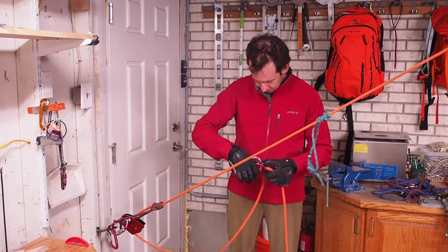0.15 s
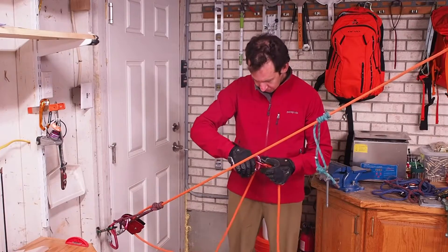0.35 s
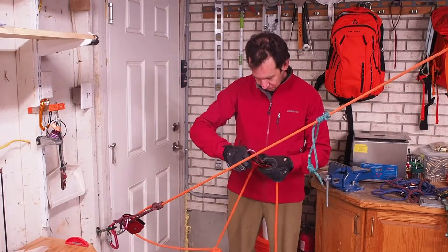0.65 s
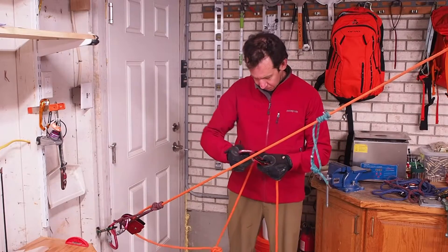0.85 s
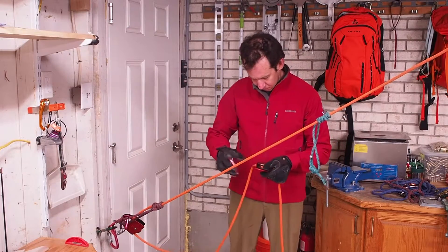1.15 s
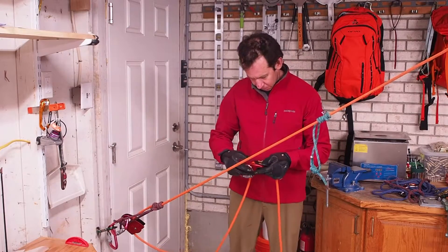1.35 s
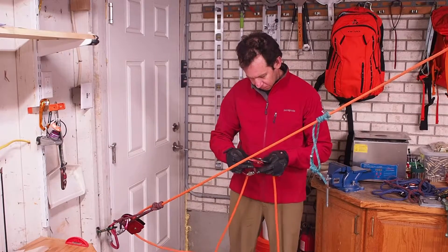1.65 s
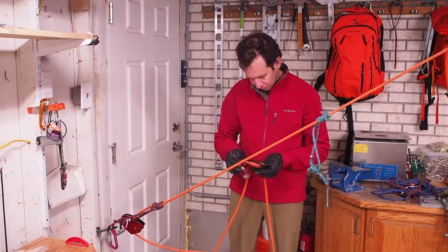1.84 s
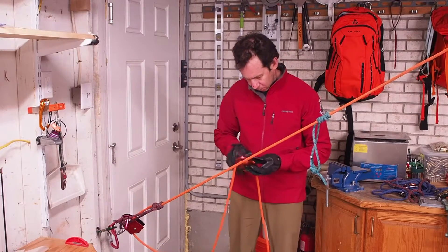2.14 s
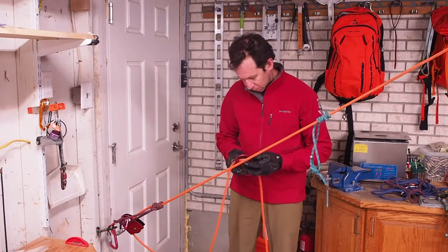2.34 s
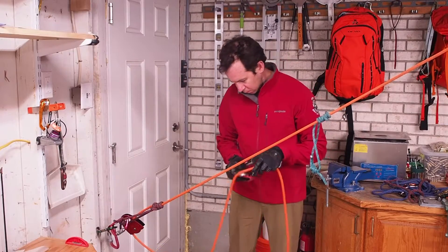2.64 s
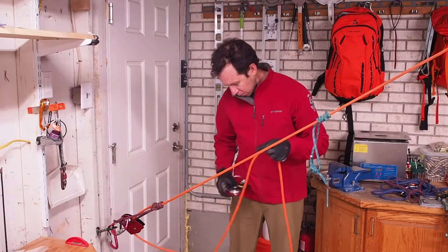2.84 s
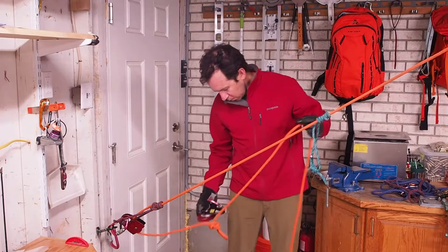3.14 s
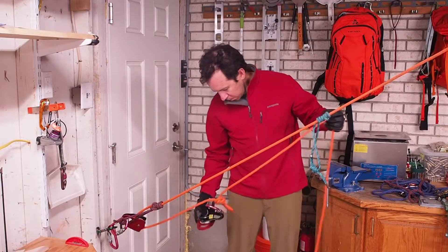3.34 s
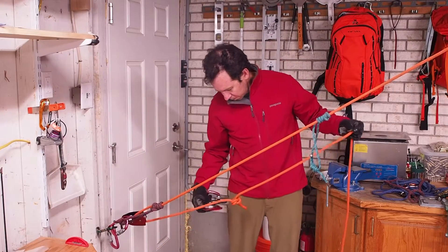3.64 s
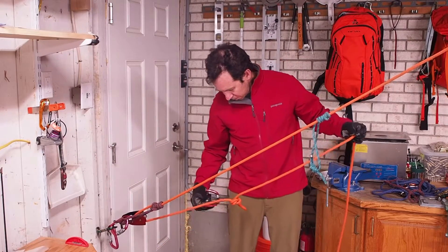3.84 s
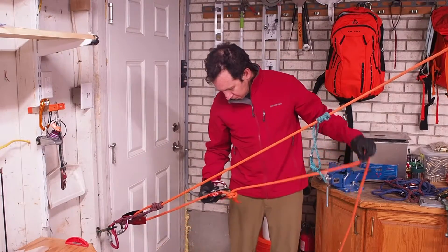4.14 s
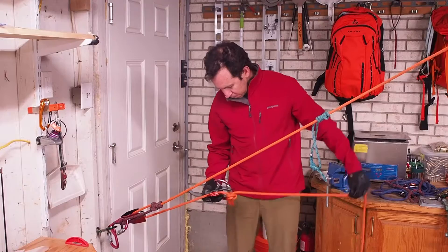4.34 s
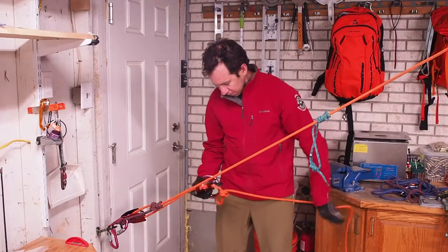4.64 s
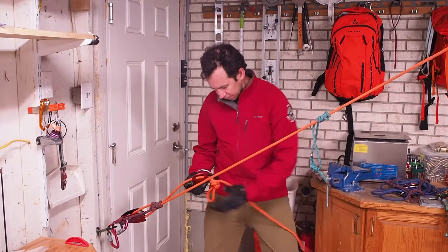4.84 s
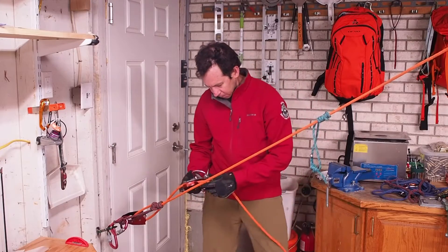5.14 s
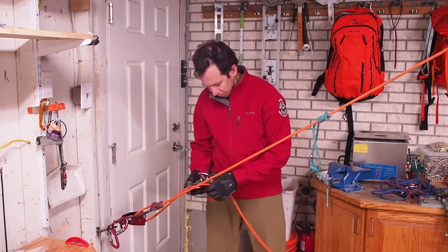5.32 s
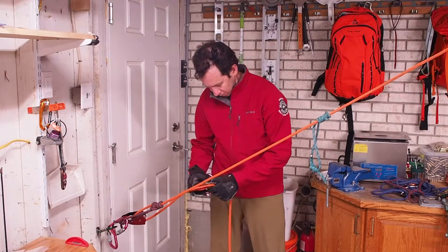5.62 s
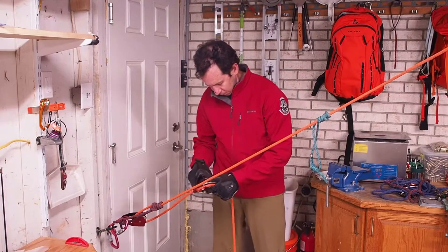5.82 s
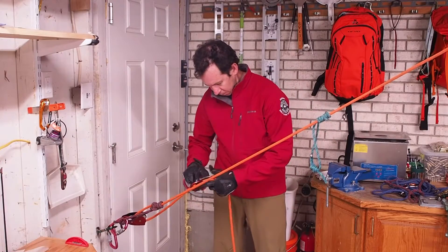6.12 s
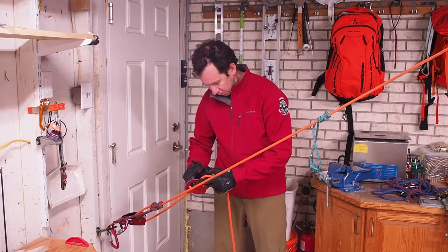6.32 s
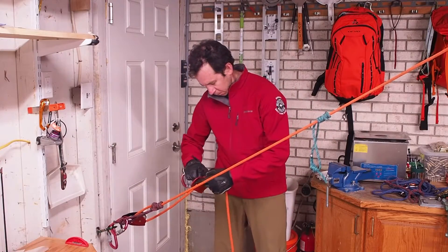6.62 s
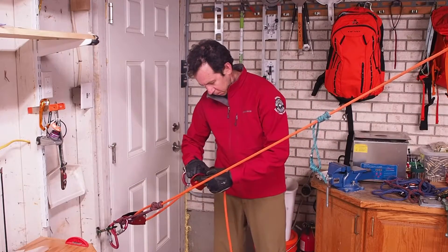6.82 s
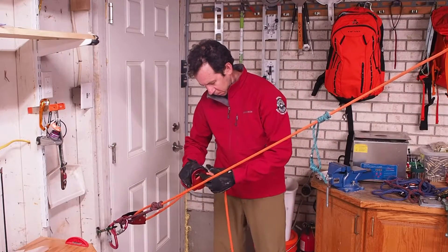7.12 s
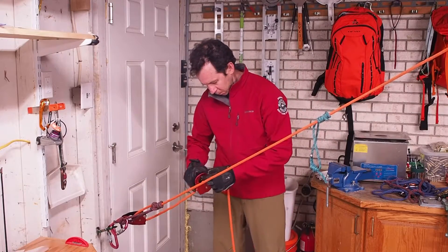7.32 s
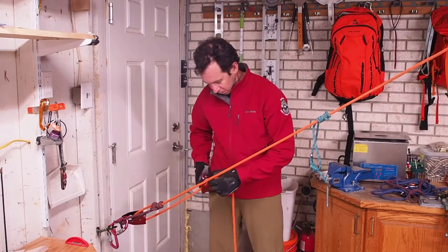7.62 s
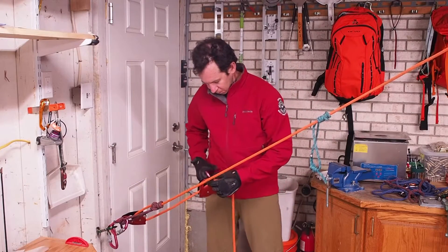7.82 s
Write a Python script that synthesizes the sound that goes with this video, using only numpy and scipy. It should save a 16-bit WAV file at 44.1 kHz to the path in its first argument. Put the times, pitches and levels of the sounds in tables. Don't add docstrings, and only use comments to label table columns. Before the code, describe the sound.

Metal pulley and carabiners rattle, snap hard and clink at close range, with gloves rubbing along rope in a small humming garage.

```python
import sys
import numpy as np
from scipy import signal
from scipy.io import wavfile
from scipy.ndimage import uniform_filter1d

SR = 44100
rng = np.random.default_rng(int(sys.argv[2]) if len(sys.argv) > 2 else 0)


def transcribe(signal):
    frames = np.atleast_2d(signal).T
    limited = np.clip(frames, -1, 1)
    pcm = np.round(limited * 32767).astype(np.int16)
    wavfile.write(sys.argv[1], SR, pcm)


def undo_db(level):
    steps = np.asarray(level, float) / 20
    return 10 ** steps


N = 351477

# (time [s], blow level [dB], dull part [dB], best rung pitch [Hz], ring level [dB])
PULLEY_KNOCKS = [
    (0.1126, -39.5, -7.5, 3650, -2),
    (0.2119, -24, -14, 3240, -19),
    (0.2346, -9, -19, 4900, -13),
    (0.393, -21.5, -18.5, 2140, -1.5),
    (0.4443, -12, -20.5, 3970, -9),
    (0.7045, -32, -17.5, 2640, -0.5),
    (0.7474, -11, -16, 5020, -7.5),
    (0.7997, -28.5, -11, 1690, -6.5),
]
PLATE_KNOCKS = [
    (0.8808, 4.5, -31, 3460, -14.5),
    (1.3518, -1.5, -23, 3660, -10.5),
    (1.5526, -11.5, -19.5, 3470, -7.5),
]
CLIP_KNOCKS = [(2.2524, -6.5, -25, 3270, -4), (2.3392, -7.5, -26, 3260, 2), (2.4277, -10, -29, 3260, -0.5),
               (2.4855, -19.5, -26, 4690, -4.5), (4.4087, -16, -18, 4670, -5),
               (3.8644, -40, -15, 1600, -12), (4.8671, -28, -12, 1750, -12), (5.0244, -32, -7.5, 1770, -14),
               (6.906, -44.5, -18, 3700, -11), (7.387, -48, -2, 2250, -8), (7.4907, -37.5, -7, 1960, -9)]
HOOK_KNOCKS = [
    (2.6550, -10, -32, 7600, -8),
    (2.6972, -14, -20.5, 5990, -7),
    (4.1990, -22, -19.5, 6100, -5),
    (4.2799, -31, -15, 3930, -11),
    (4.3597, -38, -12, 3800, -1),
    (5.2655, -14, -24, 3800, -4),
    (5.3700, -16, -15, 5530, -10),
]
GATE_KNOCKS = [
    (.9823, 9.5, -22.5, 14480, 0.79),
]
LOOSE_KNOCKS = [
    (.53, -47, 2, 1750, 0),
    (4.283, -52, 4, 1690, 0),
    (4.325, -55, 4, 1690, 0),
    (4.44, -54, 4, 1690, 0),
]
# (time [s], length [s], level [dB], dull part [dB], best rung pitch [Hz])
CHATTER = [(-.03, 0.042, -20.5, -32, 3740), (0.143, 0.028, -25.5, -8.5, 3700),
           (0.366, 0.021, -28, -24, 7900), (0.465, 0.086, -43, -2.5, 1690),
           (0.806, 0.051, -17.5, -14.5, 3550), (0.882, .02, -13.5, -10.5, 6300),
           (1.379, 0.046, -20, -16, 4130), (1.442, 0.055, -24, -15.5, 2050),
           (1.903, 0.077, -18, -20.5, 4350), (3.105, 0.096, -28, -12.5, 4400), (4.26, 0.19, -41, -10, 1690),
           (5.267, .02, -21.5, -18.5, 4600), (5.489, 0.047, -37.5, -10.5, 1600),
           (5.577, 0.027, -40, -14, 4000), (7.355, 0.055, -40, -5, 2140)]

# (pitch [Hz], level [dB], t60 [s])
PULLEY = [(894, -7, 0.0318), (1557, -3.5, 0.043), (1702, -1.5, 0.039), (2050, 11.5, 0.014),
          (2374, 2.5, 0.037), (3260, 9.5, 0.018), (3580, 5.5, 0.032), (3734, 9.5, 0.0275), (4130, 2, 0.08),
          (4350, 5, 0.06), (4655, 3, .05), (6300, 2.5, 0.049), (7660, 2.5, 0.095), (9000, -6, 0.039),
          (10430, -6.5, 0.051), (13700, -3, .04)]
PLATE = [(847, -15, 0.24), (1537, -7.5, 0.099), (1600, 4, 0.029), (2050, 9.5, 0.022), (2286, -0.5, .06),
         (3260, 2, 0.072), (3537, 8.5, 0.028), (4130, -17, 0.05), (4700, 2, 0.031), (6300, -8, 0.075),
         (7800, -12, .06), (9800, -7.5, .06), (11200, -5, 0.0497), (13600, -5, .05)]
HOOK = [(1810, -2.5, 0.043), (2450, -5, 0.064), (3270, -7, 0.16), (3810, -1, 0.067), (4706, 1, 0.1),
        (5100, -21, 0.059), (6100, -1.5, 0.049), (7510, 3, 0.091), (8200, -19, 0.071), (10040, 1, .08),
        (11600, -13, .08), (13450, 4, .06), (14860, -6, .04), (15500, -5, .04)]
GATE = [(12830, -6, .05), (13090, -4, .05), (13290, -3, .05), (13560, -5, .05), (13790, -3, .05),
        (13930, -4, .06), (14150, -3, .04), (14320, -4, .05), (14500, -2, .05), (14840, -2, .05),
        (15100, -1, .05), (15420, -3, .03)]
CLIP_HZ = [1685, 1785, 2250, 3257, 3750, 4300, 4675, 5030, 5290, 6195, 7510, 8660, 9900, 11100, 13550,
           15360]
# (level [dB], t60 [s])
CLIP_RING = [(-1, 0.025), (-9, 0.08), (-2.5, 0.031), (-10, 0.21), (-2, .06), (-10, 0.059), (1.5, 0.053),
             (-24, 0.035), (-24, 0.049), (2, 0.036), (3, 0.022), (-2.5, 0.073), (-7, 0.018), (-15, .06),
             (11, 0.073), (-8, .04)]

# (crack t60 [s], left-right difference [dB], bright part at a medium blow [dB],
# brightening [dB per dB harder], seating time [s])
PULLEY_CRACK = (.034, .3, -20, -0.28, .0009)
PLATE_CRACK = (0.0421, -3.3, -18, -.2, .0002)
CLIP_CRACK = (0.0364, 0.2, -30.5, 0.12, .0003)
HOOK_CRACK = (.045, 1, -23, 0.63, .0025)
GATE_CRACK = (0.0066, -8, -11, 0.0356, .0002)
CHATTER_CRACK = (0.0143, -0.3, -22, 0.96, .0004)

# (middle time [s], half length [s], pressure level [dB], cloth against rope [dB])
STROKES = [(.1, 0.34, -51.5, 1), (1.04, 0.44, -48.5, -5), (2.078, 0.16, -45, 0), (2.84, 0.4, -50, -2),
           (3.205, 0.15, -56, -3), (3.74, 0.4, -55, -11), (4.206, 0.086, -49, -7), (4.594, 0.18, -48.5, 0),
           (5.03, 0.24, -40, -0.5), (5.51, 0.19, -50, -5.5), (5.801, 0.096, -54, 7.5),
           (6.0, 0.091, -56.5, 4.5), (6.172, 0.086, -50.5, -8), (6.585, 0.12, -53.5, 2.5),
           (7.0, .1, -60, 6), (7.16, .07, -51, -4), (7.413, 0.087, -57, -13), (7.55, 0.091, -50.5, 1),
           (7.65, .035, -47.5, 2), (7.7, 0.13, -53.5, -1.5), (7.97, 0.17, -51.5, -7)]
# (level [dB], share of the cloth level [dB per dB])
RUB_LAYERS = [(-0.44, -0.31), (-3.5, 0.13), (-5, 0.98)]
# (low edge [Hz], high edge [Hz], left-right likeness [0-1])
RUB_BANDS = [(550, 1500, .8), (1800, 6500, .5), (7000, 15800, .2)]
# (time [s], puff level [dB], push level [dB], push pitch [Hz], length [s])
BUMPS = [
    (1.197, -44, -36, 107, 0.073),
    (3.5, -33.5, -37, 129.7, 0.077),
    (3.53, -37.5, -43, 300, 0.09),
    (3.975, -63, -43, 142.5, 0.083),
    (4.794, -31, -36.5, 327, 0.011),
    (4.823, -61, -38, 143, 0.069),
    (5.014, -40, -35, 290, 0.017),
    (5.032, -63, -40, 100, 0.05),
    (6.166, -42.5, -51, 149, 0.035),
    (7.357, -40.5, -38.5, 156, 0.048),
]

# (frequency [Hz], t60 [s])
WALLS = [(300, 0.31), (1500, 0.48), (4000, 0.36), (9000, 0.31), (15000, 0.26)]
# (frequency [Hz], left-right likeness [0-1])
WALLS_SAME = [(600, 0.85), (1500, 0.9), (3000, 0.089), (15000, 0.038)]
# (frequency [Hz], level [dB per Hz])
AIR = [(25, -14), (60, -4), (125, 1.5), (250, -10.5), (400, -7.5), (630, -13), (900, -8.5), (1400, -18),
       (2500, -20.5), (3700, -22), (6300, -30), (10000, -28.5), (13500, -28), (15700, -19.5)]
# (frequency [Hz], left-right likeness [0-1])
AIR_SAME = [(60, .5), (300, .5), (640, .6), (1400, .45), (3100, .15), (15000, .05)]
# (frequency [Hz], gain [dB])
MIC = [(500, 0), (6000, 4), (11600, 3), (12350, 2), (13100, 9), (13800, 6.5), (15500, -1)]

MEDIUM_DB = -20
AIR_DB = -50.5
OFFSET = -0.0045
EDGE_HZ = 15850


def evened(x):
    return x / np.sqrt(np.mean(x ** 2) + 1e-20)


def read(points, hz):
    f, value = np.transpose(points)
    return np.interp(np.log(hz + 1), np.log(f + 1), value)


def band(x, lo_hz, hi_hz, order=2):
    return signal.sosfilt(signal.butter(order, [lo_hz, hi_hz], "band", fs=SR, output="sos"), x)


def add(mix, s, sound):
    part = mix[..., round(s * SR):][..., :sound.shape[-1]]
    part += sound[..., :part.shape[-1]]


def pair(frames, bins, same):
    a, b, c, d = rng.standard_normal((frames, bins, 4)).T
    same = same[:, None]
    left = a + 1j * b
    right = same * left + np.sqrt(1 - same ** 2) * (c + 1j * d)
    return np.array([left, right])


def contact_crack(t, crack_t60, dull_db, bright_db, side):
    burst = rng.standard_normal((2, len(t))) * (undo_db(-60 * t / crack_t60) + 0.51 * np.exp(-t / 0.00065))
    burst[1] = 0.7 * burst[0] + 0.5 * burst[1]
    crack = band(burst, 2960, 5100)
    crack += undo_db(0.67 * bright_db + 9) * band(burst, 6060, 11540, order=5)
    crack += undo_db(dull_db + 11.5) * band(burst, 885, 2130, order=3)
    crack += side * undo_db(bright_db + 13.0) * band(burst, 13150, 16400, order=5)
    return crack


def ringing(t, modes, best_hz, ring_db, dull_db, bright_db):
    hz, db, t60 = np.transpose(modes)[:, :, None]
    chance = rng.standard_normal((len(modes), 3))
    colour = [(1500, dull_db + 26.5), (3200, 0.018), (8000, 0.021), (12000, bright_db + 8.0)]
    where_db = 8 * np.exp(-(np.log(hz / best_hz) / 0.059) ** 2) + 1.8 * chance[:, :1]
    level = undo_db(db + read(colour, hz) + where_db + ring_db - 13 - 60 * t / t60)
    rings = []
    for k in (1, 2):
        phase = 1.39 * chance[:, k:k + 1] * np.minimum(hz / 3000, 1)
        rings.append((level * np.sin(2 * np.pi * hz * t + phase)).sum(0))
    return np.array(rings)


def knock(row, modes, crack_t60, side_db, medium_bright_db, harder, seat_s, bounce_db=-32.0):
    s, blow_db, dull_db, best_hz, ring_db = row
    bright_db = medium_bright_db + harder * (blow_db - MEDIUM_DB)
    t = np.arange(9000) / SR
    side = undo_db([[side_db / 2], [-side_db / 2]])
    crack = contact_crack(t, crack_t60, dull_db, bright_db, side)
    rings = ringing(t, modes, best_hz, ring_db, dull_db, bright_db)
    bounces = (rng.random(1300) < 0.006) * rng.standard_normal(1300) * undo_db(bounce_db - 330 * t[:1300])
    bounces[0] = 1
    crack = signal.fftconvolve(crack, bounces[None], axes=1)[:, :len(t)]
    seat = np.minimum(t / seat_s, 1) ** 1.5
    return undo_db(blow_db - 5) * (crack + side * rings) * seat


def chatter(row):
    s, length, db, dull_db, best_hz = row
    u = np.arange(0, 1, 1 / (length * SR))
    hits = (rng.random(len(u)) < 0.012) * rng.standard_normal(len(u))
    train = hits * np.sin(np.pi * u ** 1.31)
    ring_db = -11 - 0.28 * (db - MEDIUM_DB)
    one = knock((s, db, dull_db, best_hz, ring_db), PULLEY, *CHATTER_CRACK)
    sound = signal.fftconvolve(one, train[None] / np.linalg.norm(train), axes=1)
    return sound[:, round(max(-s, 0) * SR):]


def rubbing():
    middle, half, db, cloth_db = np.transpose(STROKES)[:, :, None]
    out = np.zeros((2, N))
    t = np.arange(0, N + 64, 64) / SR
    swell = np.exp(-abs((t - middle) / half) ** 2.05)
    for (layer_db, share), (lo_hz, hi_hz, same) in zip(RUB_LAYERS, RUB_BANDS):
        lumps = evened(uniform_filter1d(rng.standard_normal(N), 500))
        grains = evened(uniform_filter1d(rng.standard_normal(N), 70))
        fibres = rng.standard_normal((2, N)) * undo_db(1.17 * lumps + 1.2 * grains)
        fibres[1] = same * fibres[0] + np.sqrt(1 - same ** 2) * fibres[1]
        level = (swell * undo_db(db + layer_db + share * cloth_db - 8.5)).sum(0)
        out += np.interp(np.arange(N) / SR, t, level) * evened(band(fibres, lo_hz, hi_hz))
    return out


def bump(row):
    s, puff_db, push_db, push_hz, length = row
    t, rise = np.arange(12000) / SR, 0.2 * length
    shape = np.minimum(t / rise, 1) * np.exp(-2.2 * np.maximum(t - rise, 0) / length)
    puff, push = rng.standard_normal((2, len(t)))
    puff = undo_db(puff_db - 9.0) * evened(band(puff, 980 * 0.48, 980 * 1.35))
    push = undo_db(push_db - 8.5) * evened(band(push, push_hz * 0.69, push_hz * 1.14))
    return shape * (puff + push)


def walls(x):
    frames, hz = 420, np.fft.rfftfreq(256, 1 / SR)
    t = np.arange(frames) * 64 / SR
    z = pair(frames, len(hz), read(WALLS_SAME, hz)) * undo_db(-60 * t / read(WALLS, hz)[:, None])
    tail = signal.istft(z, nperseg=256, noverlap=192)[1]
    t = np.arange(tail.shape[1]) / SR
    gap = np.clip((t - 0.001) / 0.005, 0, 1)
    tail = tail * gap * (1 + 1.27 * np.exp(-t / 0.011))
    return signal.fftconvolve(x, tail / np.linalg.norm(tail[0]), axes=1)[:, :N]


def air():
    frames, hz = N // 512 + 5, np.fft.rfftfreq(2048, 1 / SR)
    patches = uniform_filter1d(rng.standard_normal((len(hz), frames)), 20, 0)
    patches = evened(uniform_filter1d(patches, 8, 1))
    z = pair(frames, len(hz), read(AIR_SAME, hz)) * undo_db(read(AIR, hz)[:, None] + 0.52 * patches)
    return undo_db(AIR_DB) * evened(signal.istft(z, nperseg=2048, noverlap=1536)[1][:, :N])


def scene():
    spots = np.zeros((3, 2, N))
    clip = np.c_[CLIP_HZ, CLIP_RING]
    parts = [(PULLEY_KNOCKS, PULLEY, PULLEY_CRACK), (PLATE_KNOCKS, PLATE, PLATE_CRACK),
             (CLIP_KNOCKS, clip, CLIP_CRACK), (HOOK_KNOCKS, HOOK, HOOK_CRACK),
             (GATE_KNOCKS, GATE, GATE_CRACK)]
    for k, (rows, modes, crack) in enumerate(parts):
        for row in rows:
            add(spots[k % 3], row[0], knock(row, modes, *crack))
    for row in CHATTER:
        add(spots[0], max(row[0], 0), chatter(row))
    for row in BUMPS:
        add(spots[1], row[0], bump(row)[None])
    loose = np.zeros((2, N))
    for row in LOOSE_KNOCKS:
        add(loose, row[0], knock(row, clip, *CLIP_CRACK))
    mix = rubbing() + air()
    for spot in [*spots, loose]:
        mix += spot + undo_db(3) * walls(spot)
    return mix


def band_limit(x):
    return signal.sosfilt(signal.butter(12, 16410, fs=SR, output="sos"), x)


def record(dry):
    hz = np.linspace(0, SR / 2, 129)
    capsule = signal.firwin2(127, hz, undo_db(read(MIC, hz)), fs=SR)
    x = signal.oaconvolve(dry, capsule[None], "same", axes=1)
    x = signal.sosfilt(signal.ellip(8, 1, 60, EDGE_HZ, fs=SR, output="sos"), x) + OFFSET
    peak_db = 10 * np.log10(abs(uniform_filter1d((x ** 2).max(0), 60)) + 1e-12)
    fall = np.arange(N) * 68.0 / SR
    over_db = np.maximum(np.maximum.accumulate(peak_db + fall) - fall + 4, 0)
    cut_db = uniform_filter1d(over_db, 80, origin=39)
    x = x / undo_db(1.02 * cut_db)
    x = x + 0.38 * np.clip(abs(x) - 0.55, 0, 1)
    return band_limit(np.clip(x, -1, 1))


dry = scene()
out = record(dry)
transcribe(out)
```